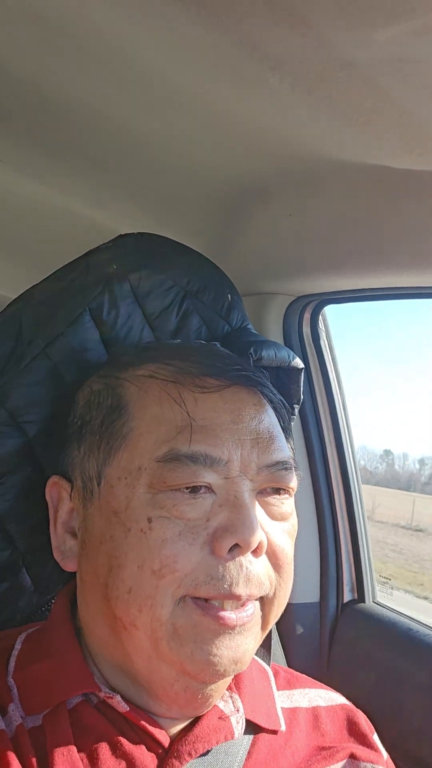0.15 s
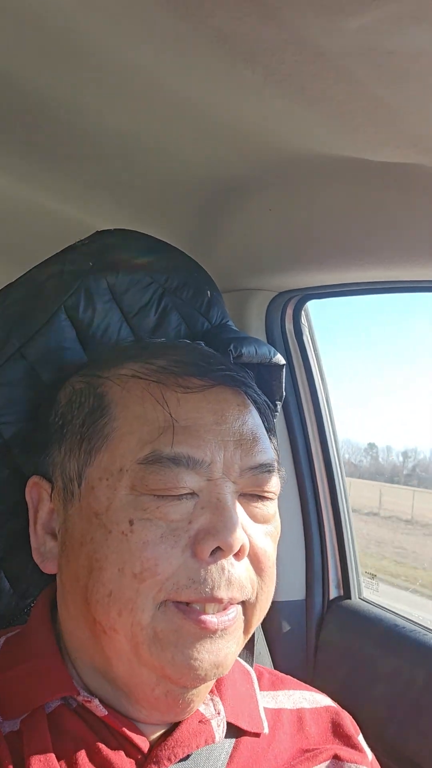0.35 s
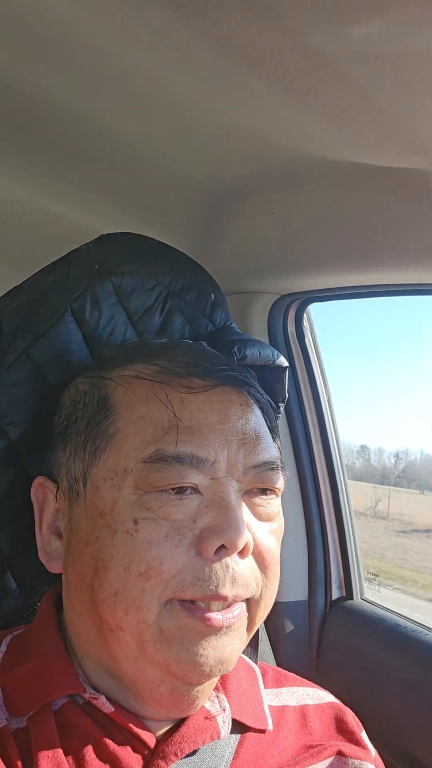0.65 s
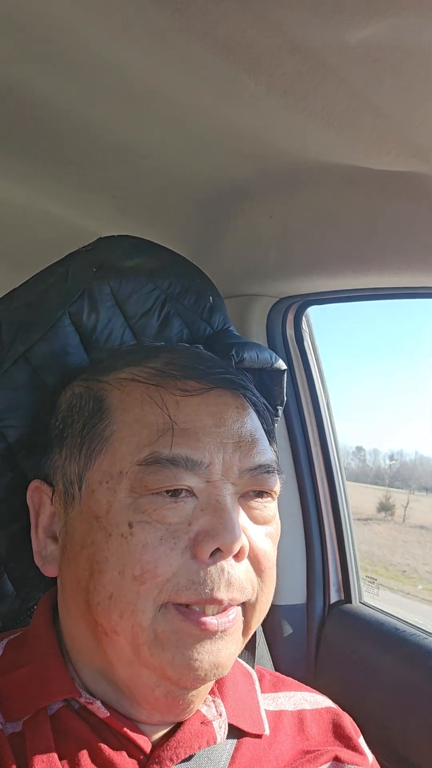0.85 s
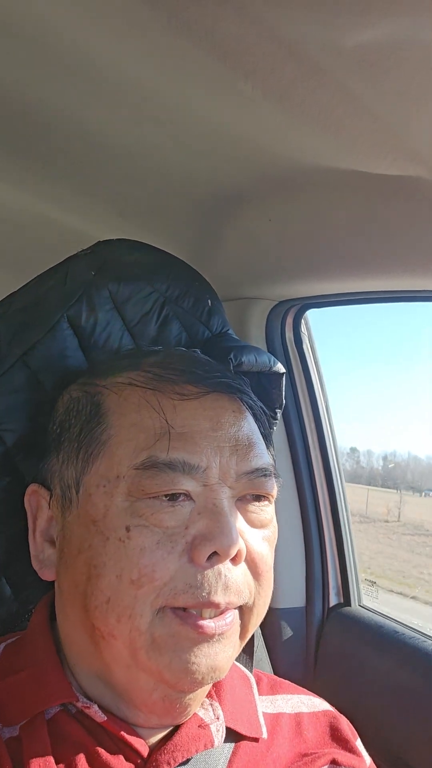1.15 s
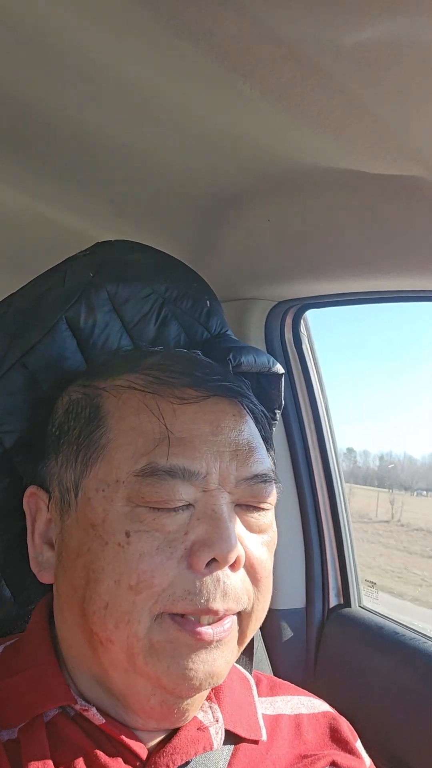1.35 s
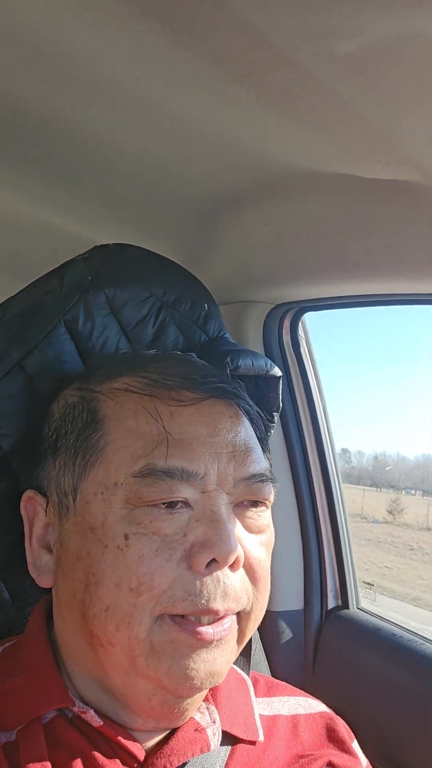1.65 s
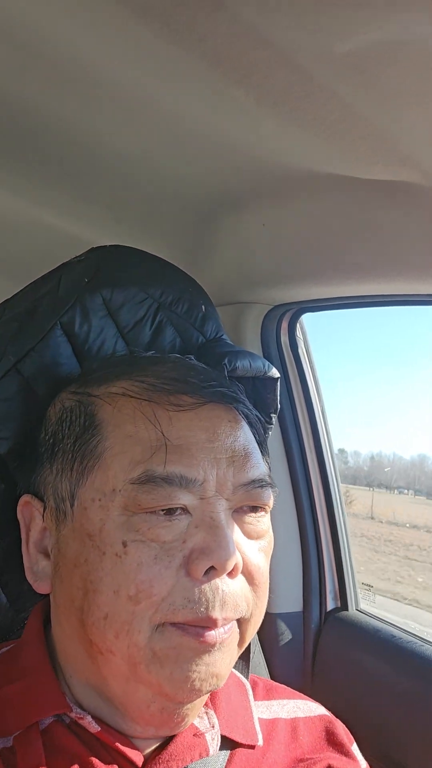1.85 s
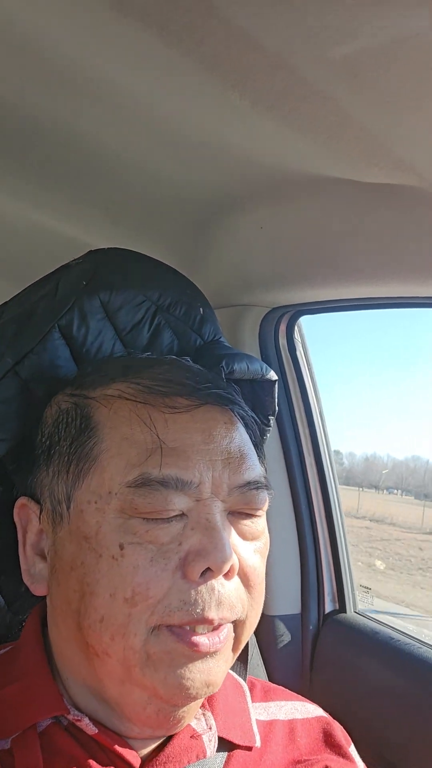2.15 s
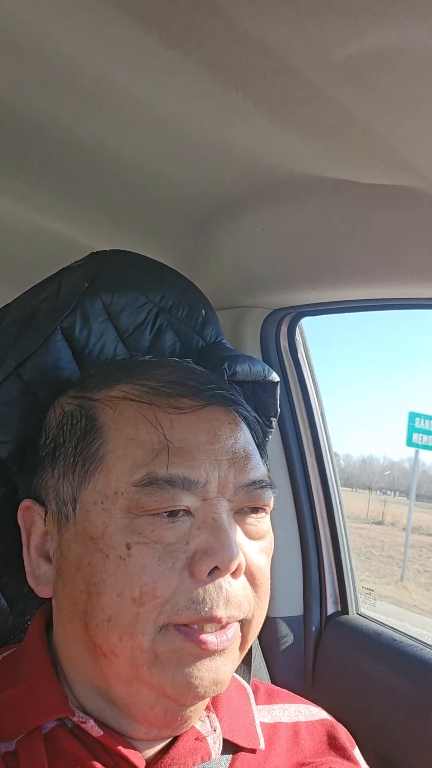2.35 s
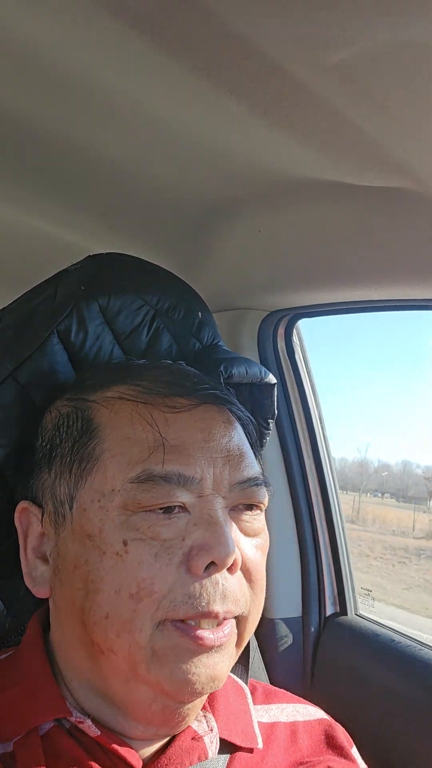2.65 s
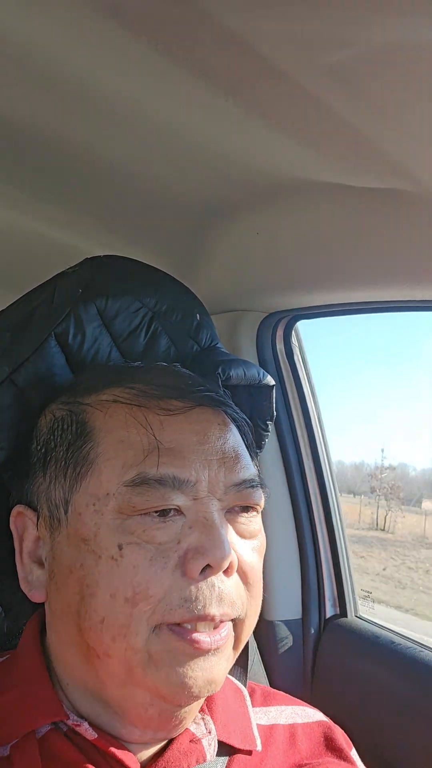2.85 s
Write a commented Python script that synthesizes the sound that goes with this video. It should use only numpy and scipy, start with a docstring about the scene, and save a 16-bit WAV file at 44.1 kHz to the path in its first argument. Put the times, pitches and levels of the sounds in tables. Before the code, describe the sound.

Road rumble runs steadily inside a car with the windows shut, its low boom swelling over uneven pavement. Air rushes faintly over the glass, while quiet rustles and small dry ticks come from close by on the right.

```python
"""Cabin boom and tyre rumble inside a car cruising along a country road, windows shut.
The stereo microphone sits in the front of the cabin. The uneven road shakes the body and sets the
cabin and the air in the tyres ringing; air rushes over the glass and the engine drones faintly.
Close by on the right something, perhaps fabric or trim, rustles, ticks and squeaks once as it rubs.
A few thin clicks sit just left of centre."""
import sys
import numpy as np
from scipy import signal
from scipy.fft import rfft, irfft, next_fast_len
from scipy.io import wavfile
from scipy.ndimage import map_coordinates

SR = 44100
rng = np.random.default_rng(int(sys.argv[2]) if len(sys.argv) > 2 else 0)


def generate_wav(sig):
    """Save sig (samples, or channels by samples) to the path in sys.argv[1] as 16-bit PCM at SR."""
    pcm = np.round(np.clip(np.atleast_2d(sig).T, -1, 1) * 32767).astype(np.int16)
    wavfile.write(sys.argv[1], SR, pcm)


N = 132300

# how far to the right the rubbing spot sits: frequency_hz, left_minus_right_db
RUBBING_BALANCE = [(3000, -8), (4000, -10), (5000, -14), (6300, -10), (8000, -4), (13000, -5)]


def boom(low_hz=22, high_hz=71.3):
    """The lowest cabin resonance swells and sinks as the uneven road shakes the body."""
    # strength of the shaking: time_s, relative_level_db
    shaking = [(0.0, -28.5), (0.04, -19.5), (0.07, -26), (0.09, -22.5), (0.15, -23), (0.19, -14),
               (0.32, -18.5), (0.35, -33.5), (0.39, -14), (0.44, -28.5), (0.61, -11.5), (0.66, -15),
               (0.68, -33.5), (0.75, -11.5), (0.83, -30), (0.89, -7.5), (0.93, -26), (0.97, -14),
               (1.07, -22), (1.34, -14.5), (1.38, -26), (1.55, -12), (1.63, -14.5), (1.65, -27),
               (1.69, -13), (1.73, -39), (1.81, -11.5), (1.86, -22), (1.93, -13.5), (1.99, -26.5),
               (2.04, -20.5), (2.07, -30.5), (2.14, -22), (2.18, -32), (2.24, -9), (2.3, -24), (2.33, -8),
               (2.36, -10), (2.41, -27), (2.46, -10.5), (2.49, -27.5), (2.53, -12.5), (2.57, -34.5),
               (2.59, -15), (2.73, -12.5), (2.78, -19.5), (2.82, -15.5), (2.94, -19), (2.97, -10.5),
               (3.0, -19)]
    mode = amp(-1) * swelling(shaking, hz=45.9, width_hz=10.6, evenness=0.76)
    band = lambda f: 1 / (1 + (low_hz / (f + 1)) ** 8 + (f / high_hz) ** 8)
    return filtered(mode, lambda f: microphone(f) * band(f))


def tyre_rumble():
    """Broad road noise comes through the body and excites cabin and tyre-cavity resonances."""
    # colour of the rumble: frequency_hz, relative_level_db
    tone = [(14, -28), (24, 6.5), (34, -14.5), (60, -4), (74, -5), (105, -6), (155, -14.5), (215, -20.5),
            (290, -18), (380, -22), (440, -29), (620, -40.5), (900, -49), (1500, -90.5)]
    # cabin and tyre-cavity resonances: pitch_hz, width_hz, level_db
    modes = [(66.3, 16, -31.5), (83.5, 13, -36), (150.8, 14, -39), (174.3, 18, -39), (464.3, 8.5, -55),
             (551.5, 27, -54)]
    return amp(-24.5) * cabin_noise(lambda f: amp(along(tone, f))) + ringing(modes)


def road_bands(hollow_hz=331.6):
    """Tyres hum on rough patches, the air in them rings, and a hollow band of road noise flickers."""
    # tyre hum and ring of the air inside, each: time_s, relative_level_db
    hum_levels = [(0.0, -27), (0.19, -23.5), (0.22, -34), (0.32, -20), (0.34, -31), (0.63, -25.5),
                  (0.65, -39), (0.88, -23), (0.9, -22.5), (1.01, -28), (1.31, -23), (1.5, -30.5),
                  (1.55, -17), (1.69, -30), (2.17, -26), (2.23, -22.5), (2.67, -29.5), (2.73, -28),
                  (2.77, -34), (2.82, -21), (2.85, -21.5), (3.0, -30.5)]
    ring_levels = [(0, -36.5), (.35, -41.5), (.7, -36.5), (.95, -39.5), (1.2, -35.5), (1.47, -35),
                   (1.62, -38.5), (1.85, -36.5), (2.2, -44), (2.55, -37.5), (3, -42)]
    # irregular flicker of the hollow band: time_s, relative_level_db
    flicker = [(0.0, -42.5), (0.07, -27), (0.09, -36), (0.72, -43), (1.46, -36), (1.49, -53), (1.55, -34.5),
               (1.66, -48.5), (1.75, -30.5), (1.79, -38), (2.42, -37), (2.51, -53), (2.53, -36.5),
               (3.0, -35)]
    hum = amp(-1.5) * swelling(hum_levels, hz=129.65, width_hz=13.7, evenness=0.43)
    ring = swelling(ring_levels, hz=247.3, width_hz=22, evenness=0.11)
    hollow = amp(-1) * swelling(flicker, hz=hollow_hz, width_hz=28, evenness=0.11)
    muffled = lambda f: microphone(f) / (1 + (f / (2 * hollow_hz)) ** 8)
    return filtered(hum + ring + hollow, muffled)


def air():
    """Air rushes steadily over the shut windows."""
    # colour of the air and tread noise: frequency_hz, relative_level_db
    tone = [(300, -21), (520, 2), (660, 5), (800, -2), (1150, 1), (1550, -4), (2100, -11.5), (2700, -16.5),
            (3050, -23), (4000, -32.5), (6000, -39), (8500, -39), (10000, -58), (15000, -71)]
    # narrow resonances in the rush: pitch_hz, width_hz, level_db
    peaks = [(2354, 96, -62.5), (2520, 19, -67.5), (2621, 120, -66.5)]
    return amp(-47) * cabin_noise(lambda f: amp(along(tone, f))) + ringing(peaks)


def engine(waver_hz=0.98, wavers_per_s=4):
    """The engine drones faintly in the centre, two tones wavering together."""
    # drone tones: pitch_hz, level_db
    drone = [(123.8, -50), (242.2, -52.5)]
    drift = map_coordinates(rng.standard_normal(256), [np.arange(N) / SR * wavers_per_s])
    speed = 1 + drift * waver_hz / drone[0][0]  # waver_hz applies to the lower tone
    clock_s = np.cumsum(speed) / SR
    return sum(amp(db) * np.sqrt(2) * np.sin(2 * np.pi * (hz * clock_s + rng.random()))
               for hz, db in drone)


def rustle():
    """Soft rubs close on the right, each with a high sheen, over a faint shiver and hiss."""
    # rubs: start_s, length_s, body_db, sheen_db
    rubs = [(0.04, 0.18, -70.5, -77), (0.112, .05, -65.5, -74), (.25, .08, -70.5, -85),
            (0.413, 0.053, -71, -80), (.585, 0.092, -68.5, -78), (.715, 0.065, -74.5, -81),
            (.895, .034, -69, -86.5), (1.142, 0.11, -69, -76.5), (1.544, 0.042, -67, -80),
            (1.643, 0.15, -70, -84), (1.8, .065, -71, -78), (2.098, 0.046, -71.5, -81.5),
            (2.235, 0.16, -68, -82), (2.42, 0.044, -64.5, -79), (2.486, 0.13, -68, -79),
            (2.542, 0.028, -70.5, -75), (2.632, 0.092, -63, -75), (2.727, 0.066, -69, -77),
            (2.84, 0.078, -64, -70.5)]
    # shiver and top hiss under the rubs, each: time_s, level_db
    shiver_levels = [(0, -68.5), (.55, -73), (.7, -70.5), (.85, -73.5), (1.1, -71.5), (1.4, -70.5),
                     (1.85, -72.5), (1.97, -73), (2.2, -69.5), (2.6, -68.5), (3, -67)]
    hiss_levels = [(0, -80), (.5, -89.5), (.88, -91), (1.45, -86), (1.85, -85.5), (1.97, -99), (2.15, -85),
                   (3, -83.5)]
    # colours of the body, the sheen and the shiver, each: frequency_hz, relative_level_db
    body_tone = [(2000, -20.5), (3400, -4.5), (4200, -3), (5000, -1.5), (5600, -6.5), (6300, -5.5),
                 (6900, -9), (7500, -1), (8000, -12), (8700, -7), (10000, -30.5), (15500, -36.5)]
    sheen_tone = [(6000, -26.5), (8600, -7), (10000, -16.5), (12300, 0.5), (14500, -5.5), (15500, -6.5)]
    shiver_tone = [(2000, -18.5), (3400, -22), (4200, -2.5), (4950, 0), (5600, -4), (6600, -9),
                   (7500, -11.5), (8800, -20.5), (10000, -35.5), (15500, -40.5)]
    body = sum(amp(db) * stroke(start, length) for start, length, db, _ in rubs)
    sheen = sum(amp(db) * stroke(start, length) for start, length, _, db in rubs)
    top = np.hypot(sheen, amp(curve(hiss_levels))) * grains(sheen_tone)
    shiver = amp(curve(shiver_levels))
    return catching() * (body * grains(body_tone) + top + shiver * grains(shiver_tone))


def grains(tone, grains_per_s=6000, spread_db=3, flutter_db=1.1, flutters_per_s=80):
    """Rubbing sheds dense, tiny grains of sound that come in clumps; rms 1."""
    onsets = rng.random(N) < grains_per_s / SR
    hits = onsets * amp(spread_db * rng.standard_normal(N)) * rng.standard_normal((2, N))
    clumps = map_coordinates(rng.standard_normal(1024), [np.arange(N) / SR * flutters_per_s])
    return from_rubbing_spot(hits * amp(flutter_db * clumps), tone)


def catching(slips_per_s=40, t60_s=0.009):
    """The rubbing surfaces catch and let go at random: a gain with brief peaks, rms 1."""
    slips = (rng.random(N) < slips_per_s / SR) * rng.random(N)
    decay = np.exp(-np.log(1000) / (t60_s * SR))
    snaps = signal.lfilter([1], [1, -decay], slips)
    return unit(1 + amp(7) * snaps)


def ticks(rise_s=0.001):
    """Small dry snaps close on the right, each with a brief tail from the padded cabin."""
    # snaps: start_s, level_db
    snaps = [(.1985, -51.5), (0.3563, -40), (.607, -53), (1.1548, -51), (1.6233, -54), (1.8552, -53),
             (2.4274, -52), (2.6464, -53.5), (2.6754, -51.5), (2.829, -44.5), (2.9667, -46)]
    # their colour: frequency_hz, relative_level_db
    tone = [(2500, -25.5), (3400, -24), (3900, -18.5), (4400, -4.5), (5000, -6), (5600, -0.5),
            (6200, -11.5), (6900, -17), (7400, -13), (9000, -26), (10000, -29.5), (12000, -22.5),
            (15500, -26.5)]
    direct = bursts(snaps, rise_s, t60_s=0.014)
    tail = amp(-15) * bursts(snaps, rise_s, t60_s=0.055)
    return (direct + tail) * from_rubbing_spot(white(), tone)


def clicks(left_db=3):
    """A few thin, bright clicks close to the microphone, a little to the left."""
    # clicks: start_s, level_db
    hits = [(.698, -66.5), (.7205, -57), (.748, -59), (2.142, -58.5), (2.711, -60)]
    # their colour: frequency_hz, relative_level_db
    tone = [(3000, -24), (6000, -4), (9000, -4), (10000, -12.5), (12500, -1), (15500, -6.5)]
    sparkle = unit(filtered(white(), lambda f: amp(along(tone, f))))
    return bursts(hits, rise_s=0.00028, t60_s=0.022) * sparkle * amp([[left_db / 2], [-left_db / 2]])


def squeak(start_s=0.034, length_s=0.11, start_hz=3190, rise_hz_per_s=4100, width_hz=480):
    """A faint, husky squeak in the first rub, rising slightly as the rubbing speeds up."""
    pitch_hz = start_hz + rise_hz_per_s * np.clip(np.arange(N) / SR - start_s, 0, length_s)
    husk = filtered(white(), lambda f: np.exp(-(2 * f / width_hz) ** 2))
    glide = np.sin(2 * np.pi * np.cumsum(pitch_hz) / SR)
    tone = unit(husk * glide * sides(RUBBING_BALANCE, pitch_hz))
    return amp(-67.5) * stroke(start_s, length_s) * tone


def microphone(f):
    """Complex gains with which the cabin's sound reaches the left and right microphone ports."""
    # balance at the ports: frequency_hz, left_minus_right_db
    balance = [(30, 2), (120, 0.5), (340, 4), (520, -2.5), (1100, -1.5), (2100, -8.5), (2600, -3.5),
               (4000, -13), (9000, 0.5)]
    # phase by which the left port leads: frequency_hz, lead_rad
    lead = [(25, 0.13), (60, 0.43), (150, 0.32), (400, 0.14)]
    return sides(balance, f) * np.exp(1j * np.outer([.5, -.5], along(lead, f)))


def cabin_noise(gain):
    """Stereo noise at the microphone, nearly mono in the bass and diffuse in the treble; rms 1."""
    # likeness of left and right: frequency_hz, correlation
    likeness = [(30, .98), (130, .985), (360, .95), (480, .55), (900, .42), (1300, -.1), (2500, 0),
                (8000, 0)]
    spread = lambda f: np.arccos(np.clip(along(likeness, f), -1, 1)) / 2
    mid, side = white()
    common = filtered(mid, lambda f: gain(f) * microphone(f) * np.cos(spread(f)))
    opposed = filtered(side, lambda f: gain(f) * microphone(f) * np.outer([1, -1], np.sin(spread(f))))
    return unit(common + opposed)


def from_rubbing_spot(x, tone):
    """Colour a sound and place it on the right; rms 1."""
    return unit(filtered(x, lambda f: amp(along(tone, f)) * sides(RUBBING_BALANCE, f)))


def ringing(modes):
    """Cabin noise ringing in each of several resonances."""
    return sum(amp(db) * cabin_noise(lambda f: resonance(f, hz, width)) for hz, width, db in modes)


def swelling(levels, hz, width_hz, evenness):
    """Noise in one resonance follows a level curve; evenness (0-1) flattens its own random beating."""
    ring = signal.hilbert(filtered(white(channels=1)[0], lambda f: resonance(f, hz, width_hz)))
    evened = ring.real / (np.abs(ring) + 1e-9) ** evenness
    return unit(evened) * amp(curve(levels))


def resonance(f, hz, width_hz):
    """Gain of a steep-sided resonance."""
    return 1 / (1 + ((f * f - hz * hz) / (np.pi / 2 * width_hz * (f + 1))) ** 2)


def stroke(start_s, length_s):
    """Rounded envelope of one rub."""
    progress = np.clip((np.arange(N) / SR - start_s) / length_s, 0, 1)
    return np.abs(np.sin(np.pi * progress)) ** 0.26  # the low power flattens the top


def bursts(hits, rise_s, t60_s):
    """Envelope of quickly dying bursts."""
    envelope = np.zeros(N)
    for start_s, db in hits:
        age_s = np.maximum(np.arange(N) / SR - start_s, 0)
        envelope += amp(db) * (1 - np.exp(-age_s / rise_s)) * np.exp(-np.log(1000) * age_s / t60_s)
    return envelope


def sides(balance, f):
    """Left and right gains for a balance curve."""
    return amp(np.outer([.5, -.5], along(balance, f)))


def white(channels=2):
    """White noise, longer than the scene so that filters are already ringing."""
    return rng.standard_normal((channels, next_fast_len(N + SR // 2)))


def filtered(x, response):
    """Pass x through a frequency response and cut it to the scene's length."""
    size = next_fast_len(N + SR // 2)
    return irfft(rfft(x, size) * response(np.fft.rfftfreq(size, 1 / SR)), size)[..., :N]


def along(points, hz):
    """Interpolate (frequency_hz, value) points on a log axis."""
    frequencies, values = np.transpose(points)
    return np.interp(np.log(hz + 1), np.log(frequencies + 1), values)


def curve(points):
    """Interpolate (time_s, value) points to one value per sample."""
    return np.interp(np.arange(N) / SR, *np.transpose(points))


def amp(db):
    """Decibels to gain."""
    return 10 ** (np.asarray(db) / 20)


def unit(x):
    """Scale to rms 1."""
    return x / np.sqrt(np.mean(x ** 2) + 1e-20)


def scene():
    """Everything heard from the front of the cabin."""
    driving = boom() + tyre_rumble() + road_bands() + engine() + air()
    return driving + rustle() + squeak() + ticks() + clicks()


def record(dry, top_hz=15800):
    """The recorder cuts off steeply above its band limit."""
    return signal.sosfiltfilt(signal.butter(16, top_hz, fs=SR, output="sos"), dry)


dry = scene()
out = record(dry)
generate_wav(out)
```